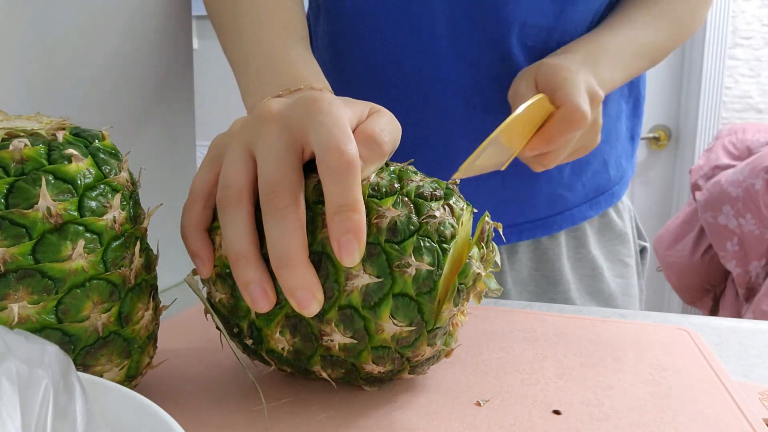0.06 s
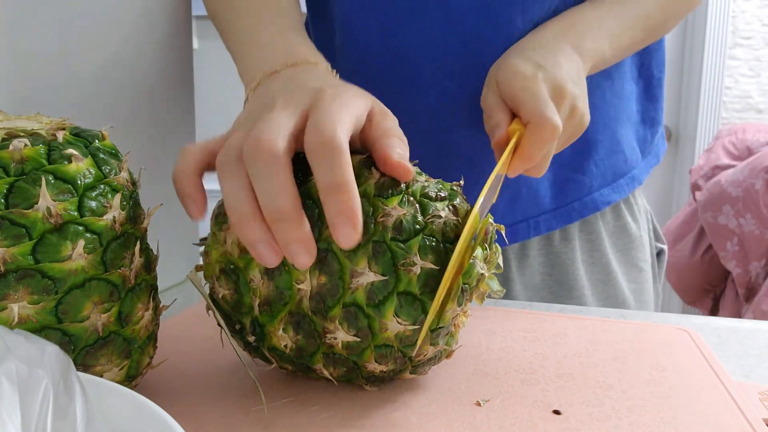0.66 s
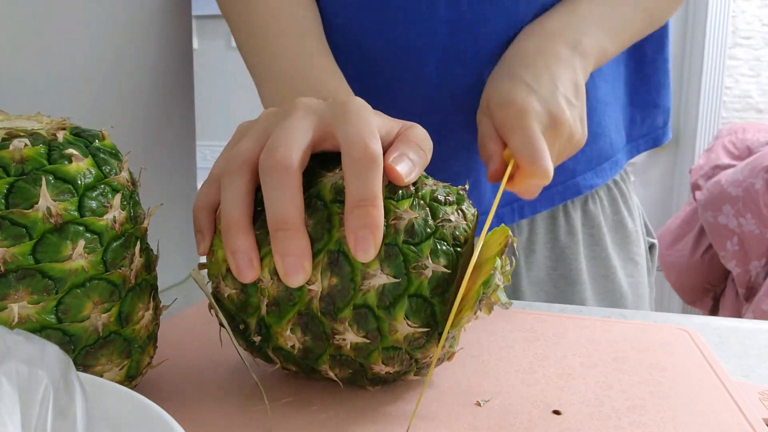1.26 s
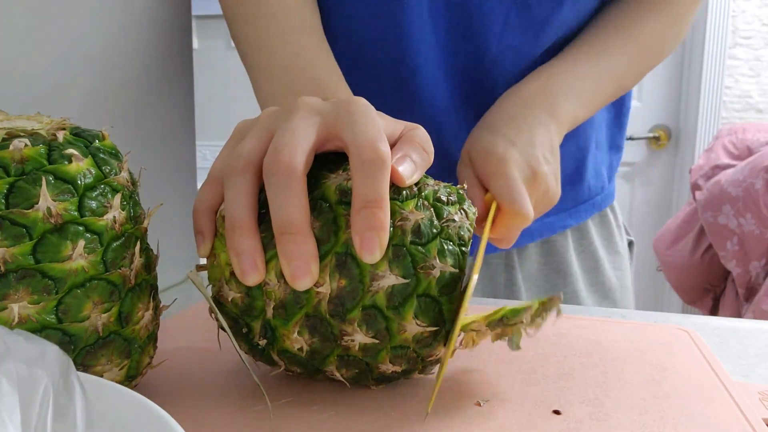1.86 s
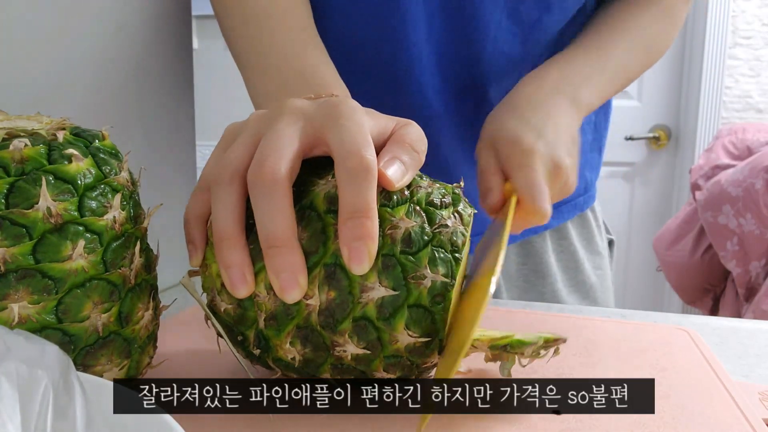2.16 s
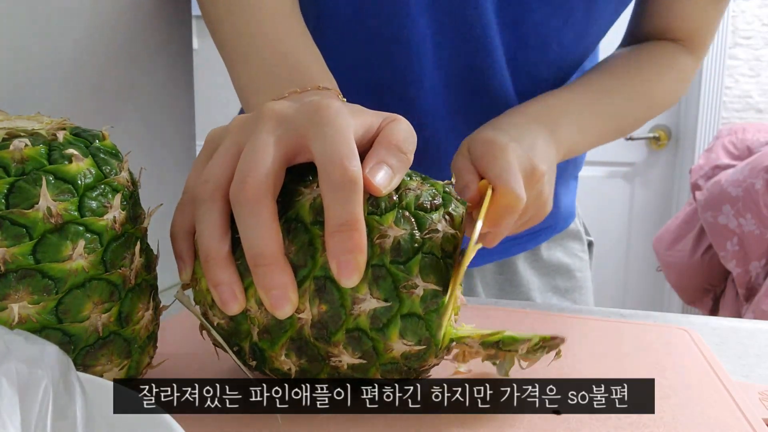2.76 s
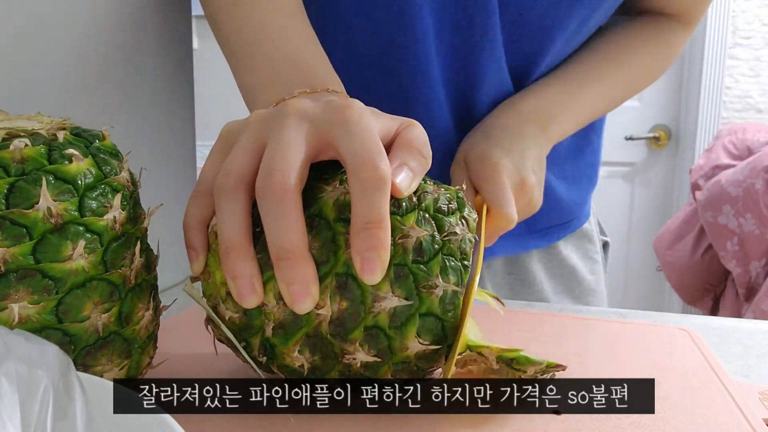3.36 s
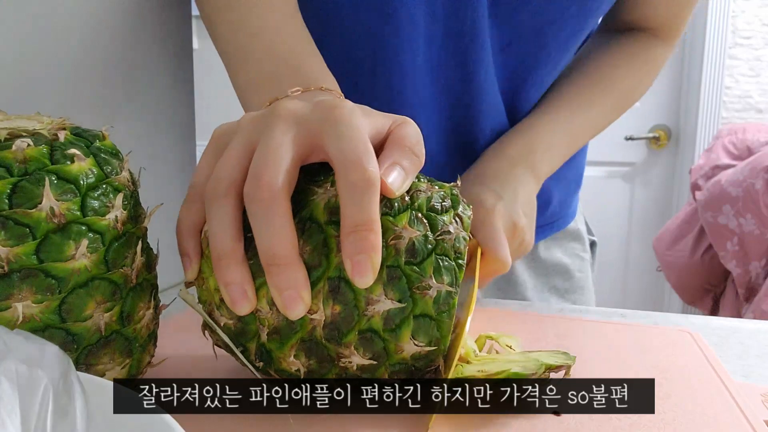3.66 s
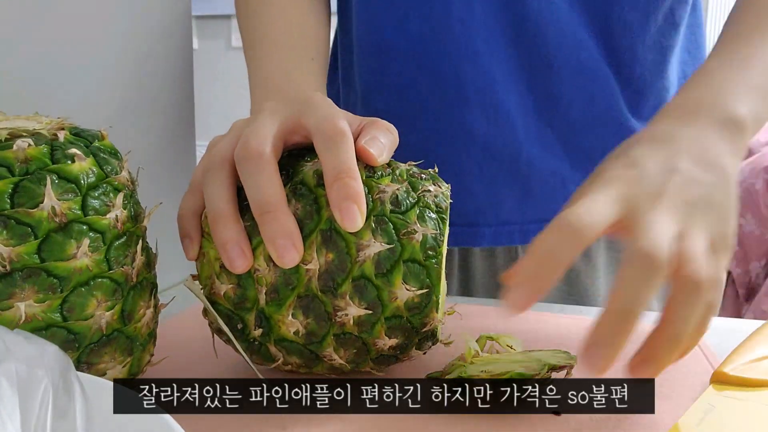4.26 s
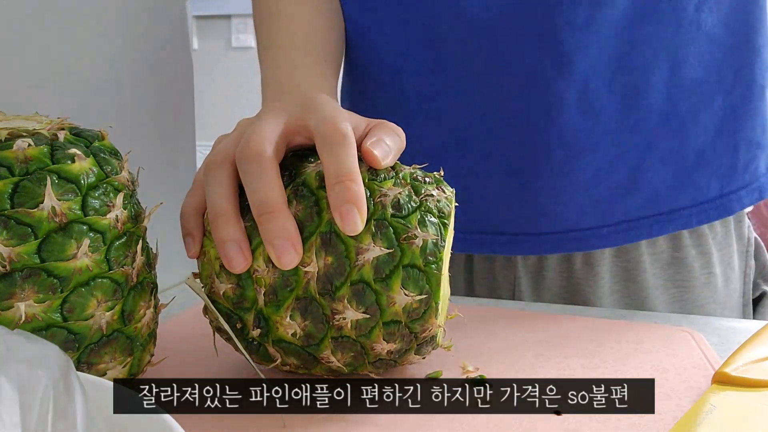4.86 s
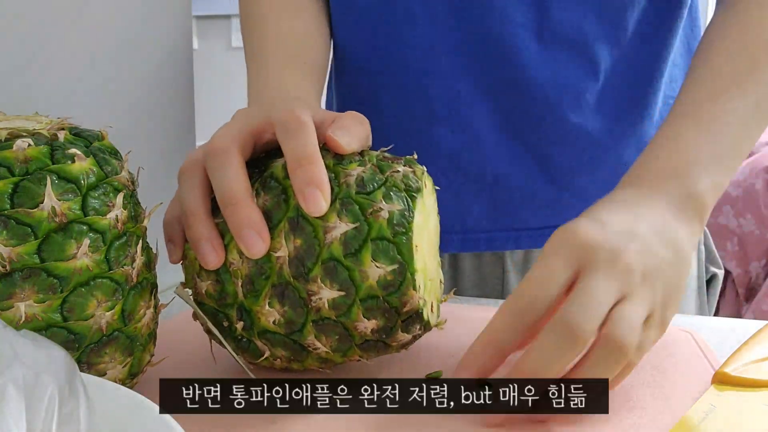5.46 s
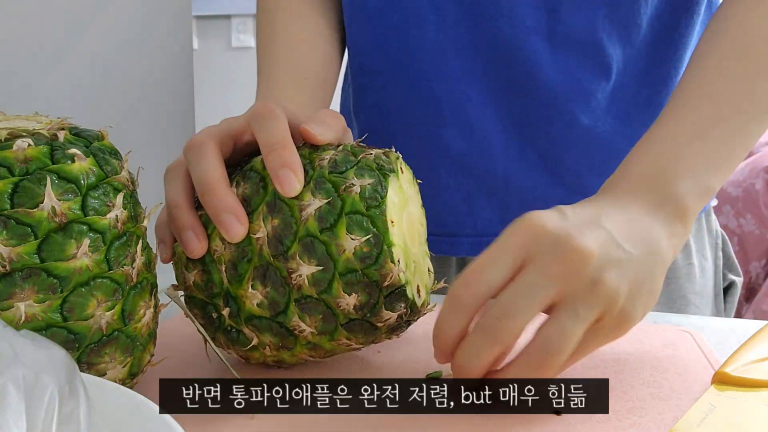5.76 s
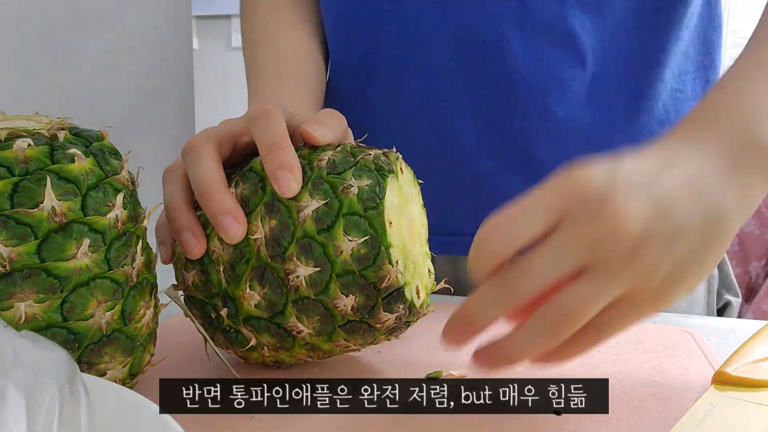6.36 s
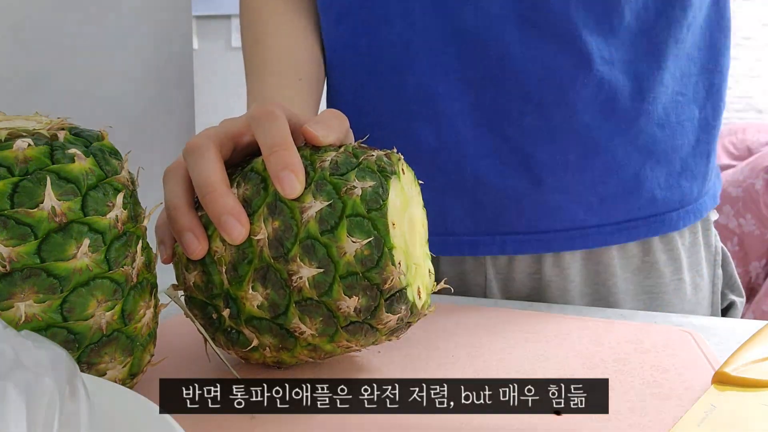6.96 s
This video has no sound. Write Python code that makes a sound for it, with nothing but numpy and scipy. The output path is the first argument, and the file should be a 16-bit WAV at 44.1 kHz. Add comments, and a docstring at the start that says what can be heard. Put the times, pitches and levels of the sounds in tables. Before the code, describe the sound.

A knife cuts a pineapple close to the microphones in a quiet kitchen with a faint low hum. Light scrapes, ticks and soft bumps open the first second. From about 1.4 to 2.4 seconds the blade saws in quick, wet, crunchy strokes, with small cracks and a dull rumble from the table. A second bout runs from 2.6 to 3.7 seconds, with a sharp snap and heavy thud near 3.2. At 3.7 the blade breaks through and hits the plastic board, the loudest sound. Between 4.2 and 4.4 seconds the knife is laid down with a clatter and a brief steel ring. Fingers sweep peel across the board around 4.6, and scraps land in a plastic bag on the left at 5.1. Soft swipes and taps follow near 5.8, another short crinkle at 6.3, and a few light taps around 6.7.

```python
"""Cutting a pineapple

A quiet kitchen, a stereo pair close to a plastic board. A knife saws a strip of skin off the fruit:
each stroke tears wet fibres, the skin snaps, the blade breaks through and knocks on the board, and
the table thuds below. The knife is laid down; fingers sweep up the scraps and drop them into a
plastic bag on the left."""
import sys
import numpy as np
from scipy import signal
from scipy.fft import rfft, irfft
from scipy.io import wavfile
from scipy.ndimage import uniform_filter1d

SR = 44100
rng = np.random.default_rng(int(sys.argv[2]) if len(sys.argv) > 2 else 0)


def generate_wav(signal):
    """Clip the signal to [-1, 1] and save it as 16-bit WAV at the path in sys.argv[1]."""
    frames = np.transpose(np.atleast_2d(signal))
    scaled = np.clip(frames, -1, 1) * 32767
    pcm = np.round(scaled).astype(np.int16)
    wavfile.write(sys.argv[1], SR, pcm)


N = 317520

# Levels in all tables are relative: each source applies its own gain.
# fingers and peel sliding over the board: start_s, end_s, hiss_db, rasp_db
RUBS = [(4.485, 4.555, -79.5, -52.5), (4.558, 4.65, -58.5, -48), (4.64, 4.705, -74.5, -59.5),
        (5.658, 5.695, -78, -59.5), (5.693, 5.775, -70.5, -50.5), (5.79, 5.84, -67, -54.5),
        (5.85, 6.06, -81.5, -69), (6.645, 6.678, -71, -59.5), (6.735, 6.885, -85, -62)]
# resonances of the plastic board: centre_hz, width_hz, height_db
BOARD_MODES = [(291, 27, 6.5), (385, 55, 10), (674, 90, 9), (791, 41, -1), (980, 95, 14), (1555, 200, 8),
               (1680, 87, 2), (2282, 180, 6.5), (3300, 130, 6.5), (4630, 170, -2.5)]
# spectrum of a contact with the board: frequency_hz, level_db
CONTACT_SPECTRUM = [(40, -21), (150, 4), (400, 1), (560, -2), (900, -6), (1200, -10.5), (2000, -12.5),
                    (3000, -17.5), (5000, -15), (8000, -28.5), (16000, -40.5)]
# spectrum of cracking skin: frequency_hz, level_db
SKIN_SPECTRUM = [(200, -26.5), (1000, -8.5), (2800, -10.5), (4500, -1), (7200, 2), (8500, -1),
                 (12000, -4.5), (16000, -7)]
# two bouts of sawing, each opening with a push; one list per bout of the knife's turns: time_s
SAW_TURNS = [
    [1.395, 1.48, 1.573, 1.649, 1.704, 1.775, 1.835, 1.899, 1.959, 2.035, 2.095, 2.176, 2.272, 2.319, 2.367],
    [2.646, 2.796, 2.87, 2.944, 3.006, 3.08, 3.145, 3.204, 3.281, 3.342, 3.41, 3.485, 3.551, 3.615, 3.68],
]
# blows on the board: time_s, knock_db, hardness_db_per_octave, table_thud_db, table_pitch_hz
BLOWS = [(0.32, -64, 5, -43, 81.6), (0.503, -63, 4, -32.5, 129), (0.734, -52.5, 5.5, -58, 109),
         (1.3, -44, -5, -31.5, 102), (1.498, -60, -4, -40, 74), (1.727, -47, -1, -36.5, 87),
         (1.866, -49, 6, -39, 110), (2.504, -47.5, -6.5, -40, 127), (2.666, -56, 2, -33, 76),
         (2.703, -57, -8, -34, 75.6), (2.766, -38.5, -0.5, -28, 96), (2.781, -50, -9, -26.5, 71),
         (3.163, -36.5, -10, -25.5, 75.5), (3.17, -19, -41, -11.5, 87), (3.479, -69, 2, -37.5, 91),
         (3.702, -43, 4, -24, 101.4), (3.714, -19.5, -1, -37, 138), (3.719, -9.5, -3.5, -20.5, 151),
         (3.735, -22, -8, -22.5, 128), (3.774, -40, -4, -35.5, 128), (3.87, -46, -5, -55, 130),
         (4.202, -35, 3, -27.5, 103.8), (4.241, -40, 5.5, -38.5, 108), (4.315, -28, 1, -25.5, 147),
         (4.33, -24, -7.5, -27, 153), (4.337, -24, -13.5, -38, 128), (4.356, -42, -4, -28, 133),
         (4.372, -33, -4.5, -26.5, 101.6), (4.421, -55, -11, -37.5, 101), (4.498, -43.5, -7, -37.5, 95),
         (4.566, -43, 1.5, -52, 110), (5.794, -47, 1, -55, 130), (5.858, -51.5, -2.5, -57, 130),
         (5.948, -51, -3, -52, 130), (6.02, -49, -4.5, -52, 130), (6.65, -49, 2, -48.5, 140),
         (6.661, -45.5, -1, -50.5, 140), (6.723, -40.5, 5, -47.5, 144), (6.939, -50.5, -1, -63, 128.6)]
LEAD_S = .03  # room for a sound to build before its peak


def amp(db):
    """Decibels to gain."""
    return 10 ** (np.asarray(db) / 20)


def unit_rms(x):
    """Scales to rms 1."""
    return x / np.sqrt(np.mean(x ** 2) + 1e-20)


def peaked(x, size):
    """Scales so that the loudest stretch of size samples has rms 1."""
    return x / np.sqrt(uniform_filter1d(x ** 2, size).max())


def curve_at(points, hz):
    """Reads a table on a log-frequency axis."""
    f, value = np.transpose(points)
    return np.interp(np.log(hz + 1), np.log(f), value)


def add(mix, s, sound):
    """Mixes a sound in at time s."""
    part = mix[max(round(s * SR), 0):][:len(sound)]
    part += sound[:len(part)]


def seconds(size):
    """Time axis of size samples."""
    return np.arange(size) / SR


def through(x, response):
    """Convolution, cut to the length of x."""
    return signal.oaconvolve(x, response)[:len(x)]


def highpass(x, hz):
    """Keeps what lies above hz."""
    return signal.lfilter(*signal.butter(2, hz, "high", fs=SR), x)


def burst(t, rise_s, decay_s):
    """Envelope that builds up to time zero and dies away after it."""
    return np.exp(-abs(t / np.where(t < 0, rise_s, decay_s)))


def colour(spectrum, modes=(), tilt_db=0, knee_hz=1000, size=8192):
    """Impulse response of energy 1: a spectrum, its resonances and a tilt per octave above the knee."""
    hz = abs(np.fft.fftfreq(size, 1 / SR))
    db = curve_at(spectrum, hz) + tilt_db * np.log2(1 + hz / knee_hz)
    for centre, width, height in modes:
        db = db + height / (1 + (hz - centre) ** 2 / width ** 2)
    minimum_phase = np.exp(np.conj(signal.hilbert(np.log(amp(db)))))
    response = np.fft.ifft(minimum_phase).real
    return response / np.linalg.norm(response)


def grains(per_s, spread_db, clump_db):
    """Tiny random clicks of uneven strength that come in clumps."""
    clicks = (rng.random(N) < per_s / SR) * rng.choice([-1, 1], N)
    strength_db = spread_db * np.minimum(rng.exponential(1, N), 5)
    clumps = unit_rms(uniform_filter1d(rng.standard_normal(N), 220))
    return unit_rms(clicks * amp(strength_db + clump_db * clumps))


def gestures(rows, column, roundness):
    """Each movement speeds up and slows to a stop; its loudness follows the speed."""
    level = np.zeros(N)
    for row in rows:
        phase = np.linspace(0, np.pi, max(round((row[1] - row[0]) * SR), 20))
        add(level, row[0], amp(row[column]) * unit_rms(abs(np.sin(phase)) ** roundness))
    return level


def effort(s):
    """Bite of the edge and force of the sawing arm on the table at time s, in dB."""
    # the arm's effort: time_s, bite_db, force_db
    arm_effort = [(0.5, -70, -65.5), (1.24, -64, -54.5), (1.42, -56.5, -52.5), (1.53, -58.5, -54),
                  (1.62, -54, -49), (1.85, -57, -45), (1.999, -56, -47), (2.16, -56.5, -51),
                  (2.329, -60, -61.5), (2.548, -60, -70), (2.72, -68.5, -49.5), (2.88, -59, -53.5),
                  (3.07, -54.5, -42), (3.25, -60, -46.5), (3.44, -62, -50.5), (3.58, -51, -49.5),
                  (3.68, -56.5, -49), (3.9, -65, -58.5)]
    times, bite, force = np.transpose(arm_effort)
    return np.interp(s, times, bite), np.interp(s, times, force, right=-90)


def kitchen(x, left_db, left_lead_s, early_db, tail_db, scatter_hz=600):
    """Direct sound at both microphones, quick reflections that shift as the arms move, a short tail."""
    t, channels = seconds(9000), []
    sway = 2 * np.pi * 2.7 * seconds(N)
    for side in (1, -1):  # left, right
        mic = np.roll(x, round(max(-side * left_lead_s, 0) * SR))
        for share in (np.cos(sway), np.sin(sway)):
            taps = rng.choice([-1, 1], len(t)) * (rng.random(len(t)) < .15) * (t > .0004)
            early = taps * np.exp(-t / .0046)
            tail = taps * np.exp(-t / .032) * (t > .008)
            echoes = amp(early_db) * early / np.linalg.norm(early)
            echoes += amp(tail_db) * tail / np.linalg.norm(tail)
            # long waves pass around small things
            mic = mic + share * through(x, highpass(echoes, scatter_hz))
        channels.append(amp(side * left_db / 2) * mic / np.sqrt(1 + amp(early_db) ** 2))
    return np.array(channels)


def room_tone():
    """Low murmur of the house, alike at both microphones in the bass."""
    # the murmur: frequency_hz, level_db
    spectrum = [(12, -48), (20, -14), (86, -2.5), (158, -4.5), (216, -17), (328, -11.5), (410, -21),
                (527, -18), (1000, -30.5), (1090, -32), (1910, -36), (2670, -42), (16000, -60)]
    # likeness of left and right: frequency_hz, correlation
    likeness = [(100, 0.98), (250, 0.6), (600, 0.5), (1500, 0.1)]
    # slow drift of the level: time_s, level_db
    drift = [(0, 2.5), (1, 2), (2.5, 2.5), (4.1, 0), (5, 0), (6.202, 0.5), (7.2, 2)]
    hz = np.fft.rfftfreq(N, 1 / SR)
    left, other = rfft(rng.standard_normal((2, N)))
    same = np.clip(curve_at(likeness, hz), 0, 1)
    right = same * left + np.sqrt(1 - same ** 2) * other
    tone = irfft(np.array([left, right]) * amp(curve_at(spectrum, hz)), N)
    return amp(-60.5 + np.interp(seconds(N), *np.transpose(drift))) * unit_rms(tone)


def thud(hz, width_hz=17, height_db=11):
    """One push on the table top: the higher the spot rings, the brighter it sounds."""
    # a push on the top: frequency_hz, level_db
    spectrum = [(20, -14), (45, 3.5), (80, 1), (130, -1.5), (200, -4), (300, -17.5), (500, -34),
                (1000, -44), (3000, -86.5)]
    # resonances of the top: centre_hz, width_hz, height_db
    table_modes = [(75, 12, 2.9), (101.8, 4.7, 1.6), (132, 3.3, 2), (167, 12, 6), (204.2, 26, 5)]
    modes = [*table_modes, (hz, width_hz, height_db)]
    return peaked(colour(spectrum, modes, tilt_db=8 * np.log2(hz / 88), knee_hz=60), size=300)


def table_top(jolt_db=5.5):
    """Blows and the knife's turns rock the table; it rumbles under the sawing arm and sweeping hand."""
    # the table's rumble: frequency_hz, level_db
    spectrum = [(20, -16.5), (45, 0), (85, 1), (120, 1), (200, -10), (300, -28), (600, -40), (2000, -69.5)]
    thuds, jolt = np.zeros(N), thud(hz=84)
    for s, _, _, db, hz in BLOWS:
        add(thuds, s, amp(db) * thud(hz))
    for s in np.concatenate(SAW_TURNS):
        add(thuds, s, amp(effort(s)[1] + jolt_db) * jolt)
    arm = amp(effort(seconds(N))[1])
    hand = gestures(RUBS, column=3, roundness=.15)
    rumble = unit_rms(through(rng.standard_normal(N), colour(spectrum)))
    return amp(-1) * thuds + (amp(.1) * arm + amp(-.5) * hand) * rumble


def plastic_bag(rise_s=.0057):
    """Thin plastic buckles in many small creases as the scraps land, then settles."""
    # landings and settlings: time_s, level_db, decay_s
    crumples = [(5.087, -37.5, 0.02), (5.135, -49, .022), (5.215, -54.5, 0.019), (6.33, -41.5, 0.0028),
                (6.41, -60, 0.013)]
    # creasing plastic: frequency_hz, level_db
    spectrum = [(100, 0.5), (400, -9), (1200, -13), (2500, -6.5), (4000, -6.5), (5500, 1), (8000, -9.5),
                (10000, -10), (13000, -5), (16000, -10.5)]
    creases = grains(per_s=5000, spread_db=2, clump_db=2)
    level = sum(amp(db) * burst(seconds(N) - s, rise_s, decay_s) for s, db, decay_s in crumples)
    return amp(1) * through(creases * level, colour(spectrum))


def cell_pops(per_s, low_hz, high_hz, cycles, spread_db, pitches=24):
    """Juicy cells burst: sparse little rings at random pitches."""
    t, out = seconds(900), np.zeros(N)
    rings = [np.sin(2 * np.pi * hz * t) * np.exp(-hz * t / cycles)
             for hz in np.geomspace(low_hz, high_hz, pitches)]
    chance, strength, pitch = rng.random(N), rng.exponential(1, N), rng.integers(0, pitches, N)
    for at in np.flatnonzero(chance < per_s / SR):
        add(out, at / SR, amp(spread_db * min(strength[at], 4)) * rings[pitch[at]])
    return unit_rms(out)


def sweeping(hand_damping=.14):
    """Fingers and moist peel stick and slip across the board, which the hand damps."""
    # hiss of sliding: frequency_hz, level_db
    spectrum = [(200, 6), (1000, 8), (2500, 7), (3600, 2.5), (5000, 6), (7000, -2), (10000, -6.5),
                (16000, -15)]
    slips = grains(per_s=2600, spread_db=4, clump_db=2.5)
    ticks = cell_pops(per_s=490, low_hz=1245, high_hz=3670, cycles=4.2, spread_db=8)
    skim = gestures(RUBS, column=2, roundness=.25)
    press = gestures(RUBS, column=3, roundness=.22)
    damped = [(hz, width, height * (1 - hand_damping)) for hz, width, height in BOARD_MODES]
    hiss = through(slips * skim, colour(spectrum))
    rasp = through(slips * press, colour(CONTACT_SPECTRUM, damped, tilt_db=-1))
    return amp(2.5) * hiss + amp(-.5) * rasp + amp(-12) * ticks * press


def blade_ring():
    """The steel rings briefly when it springs free or is laid down."""
    # tings of the blade: start_s, level_db
    tings = [(0.76, -57), (1.117, -59), (2.346, -52), (3.783, -48), (4.202, -38.5), (4.24, -41.5)]
    # modes of the steel: pitch_hz, level_db, t60_s
    modes = [(3400, 10, 0.11), (4100, 12, 0.07), (4320, 16, 0.034), (5700, 3, 0.036)]
    t, out = seconds(16000), np.zeros(N)
    steel = sum(amp(db - 60 * t / t60) * np.sin(2 * np.pi * hz * t) for hz, db, t60 in modes)
    for s, db in tings:
        add(out, s, amp(db) * peaked(steel, size=130))
    return out


def board_knocks():
    """Each solid blow rings the board; just before and after it the surfaces scuff in the treble."""
    t, out = seconds(9000) - LEAD_S, np.zeros(N)
    for s, db, tilt_db, _, _ in BLOWS:
        scuff = highpass(rng.standard_normal(len(t)), hz=2000)
        force = .12 * scuff * burst(t, rise_s=.002, decay_s=.005)
        force[round(LEAD_S * SR)] += 1  # the blow itself
        knock = through(force, colour(CONTACT_SPECTRUM, BOARD_MODES, tilt_db))
        add(out, s - LEAD_S, amp(db) * peaked(knock, size=130))
    return amp(.5) * out


def board_flex(stereo, hz, width_hz):
    """The board bends, so near hz its sound reaches the two microphones out of step."""
    left, right = stereo
    f = np.fft.rfftfreq(N, 1 / SR)
    bend = hz ** 2 - f ** 2 + 1j * f * width_hz
    return np.array([left, irfft(rfft(right) * np.conj(bend) / bend, N)])


def squelches(width_hz=260):
    """Juice fizzes past the blade through a narrow gap that rings at one pitch."""
    # pockets of juice: time_s, level_db, pitch_hz
    pockets = [(0.581, -63.5, 8300), (1.862, -51, 2860), (1.875, -45.5, 710), (2.108, -57.5, 3070),
               (2.912, -58, 1670)]
    t, out = seconds(5000), np.zeros(N)
    for s, db, hz in pockets:
        gap = np.sin(2 * np.pi * hz * t) * np.exp(-np.pi * width_hz * t)
        fizz = rng.standard_normal(len(t)) * burst(t - LEAD_S, rise_s=.0043, decay_s=.0097)
        add(out, s - LEAD_S, amp(db) * peaked(through(fizz, gap), size=130))
    return out


def skin_snaps(strain_share=.74):
    """A bundle of fibres strains and gives way: a rush of clicks that swells and dies."""
    # snaps of skin and sharp contacts: time_s, level_db, decay_s, treble_db_per_octave
    snaps = [(0.626, -61, 0.0027, 1), (0.716, -35.5, .001, -2), (1.174, -45, .002, 6),
             (1.3, -53.5, 0.0029, -3), (1.713, -41, .0035, -0.5), (1.851, -35.5, 0.0014, 5),
             (2.121, -43, 0.0026, 15), (2.665, -40, 0.012, -5.5), (2.766, -36, 0.0047, -2),
             (2.777, -34.5, 0.0022, -8), (3.163, -26.5, 0.0044, -1), (3.169, -24, 0.0023, -2.5),
             (3.695, -30.5, .003, -2), (3.719, -24, 0.0057, -4.5), (3.971, -55, 0.0074, -12),
             (4.004, -51.5, .0027, 6.5), (4.202, -37.5, 0.0019, 1.5), (4.24, -39, 0.007, -11),
             (4.315, -29.5, 0.0042, -27.5), (4.344, -31, 0.0026, -19), (4.496, -41, 0.0026, -21),
             (5.298, -58, 0.0016, -3), (5.457, -45.5, 0.0019, 3), (6.329, -35, 0.0024, -2.5),
             (6.4, -46.5, 0.0018, 0), (6.66, -52.5, .003, -9), (6.723, -40, 0.0048, -21),
             (7.142, -59, .003, -9)]
    t, out = seconds(5000) - LEAD_S, np.zeros(N)
    clicks = grains(per_s=11000, spread_db=-1, clump_db=-4.5)
    crackles = clicks[:len(snaps) * len(t)].reshape(len(snaps), -1)
    for (s, db, decay_s, tilt_db), crackle in zip(snaps, crackles):
        skin = colour(SKIN_SPECTRUM, tilt_db=tilt_db, knee_hz=3860, size=1024)
        snap = through(crackle * burst(t, strain_share * decay_s, decay_s), skin)
        add(out, s - LEAD_S, amp(db) * peaked(snap, size=88))
    return amp(-4) * out


def strokes(rest_s=.009, rasp_db=-10, pull_tear_db=-1.5, pull_rasp_db=-6.5):
    """Moves of the edge as start_s, end_s, tearing_db, rasp_db; pushes bite harder than pulls."""
    # single light scrapes on the skin: start_s, end_s, level_db
    scrapes = [(0.31, 0.356, -73), (0.571, 0.595, -67), (0.685, 0.952, -83), (0.998, 1.12, -70.5),
               (1.156, 1.278, -65.5), (1.297, 1.331, -66), (2.399, 2.418, -63), (3.887, 3.95, -70.5)]
    rows = [(start, end, db, effort(start)[1] + rasp_db) for start, end, db in scrapes]
    for turns in SAW_TURNS:
        for k, (start, end) in enumerate(zip(turns, turns[1:])):
            bite, force = effort((start + end) / 2)
            pull = k % 2
            rows.append((start + rest_s / 2, end - rest_s / 2,
                         bite + pull * pull_tear_db, force + rasp_db + pull * pull_rasp_db))
    return rows


def fresh_fibres(x, depth_db):
    """The edge meets ever new fibres, so the colour of the tearing drifts in patches."""
    frames = signal.stft(x, nperseg=256, noverlap=192)[2].T
    drift = uniform_filter1d(rng.standard_normal(frames.shape), 14, axis=0)  # smooth in time
    patches = unit_rms(uniform_filter1d(drift, 5, axis=1))  # and in frequency
    return signal.istft((frames * amp(depth_db * patches)).T, nperseg=256, noverlap=192)[1][:N]


def sawing():
    """The edge tears wet fibres and a few tough ones crack; the fruit passes the rasp to the board."""
    # tearing fibres: frequency_hz, level_db
    spectrum = [(200, -33.5), (900, -21), (2000, -8), (3200, -1), (5000, 4), (7200, 1.5), (8500, -1),
                (12000, -2), (16000, -1.5)]
    tearing = grains(per_s=5600, spread_db=3, clump_db=2.3)
    juice = cell_pops(per_s=200, low_hz=1301, high_hz=6600, cycles=9.2, spread_db=1.8)
    bite = gestures(strokes(), column=2, roundness=.8)
    press = gestures(strokes(), column=3, roundness=.51)
    hiss = fresh_fibres(through(tearing * bite, colour(spectrum)), depth_db=2.5)
    rasp = through(tearing * press, colour(CONTACT_SPECTRUM, BOARD_MODES, tilt_db=6))
    tough_fibres = grains(per_s=90, spread_db=1.5, clump_db=-.5)
    cracks = through(tough_fibres * press, colour(SKIN_SPECTRUM, tilt_db=-1.5))
    return hiss + amp(1) * rasp + amp(-9.5) * juice * np.sqrt(bite * press) + amp(-5.5) * cracks


def scene():
    """Fruit and board close up near the centre, the bag to the left, the table under everything."""
    board = kitchen(board_knocks(), left_db=-1, left_lead_s=.00002, early_db=.5, tail_db=-13,
                    scatter_hz=1700)
    return (kitchen(sawing() + squelches(), left_db=.9, left_lead_s=.00007, early_db=2, tail_db=-18)
            + kitchen(skin_snaps() + blade_ring(), left_db=1.2, left_lead_s=.00007, early_db=2,
                      tail_db=-22.5)
            + board_flex(board, hz=1870, width_hz=1250)
            + kitchen(sweeping(), left_db=3, left_lead_s=.00007, early_db=1, tail_db=-25)
            + kitchen(plastic_bag(), left_db=6.5, left_lead_s=.00032, early_db=7.5, tail_db=-22)
            + kitchen(table_top(), left_db=1.3, left_lead_s=.00022, early_db=-11, tail_db=-10)
            + room_tone())


def record(dry):
    """The recorder cuts off the highest treble."""
    lowpass = signal.firwin(511, 16150, window=("kaiser", 9), fs=SR)
    return signal.oaconvolve(dry, lowpass[None], "same")


dry = scene()
out = record(dry)
generate_wav(out)
```